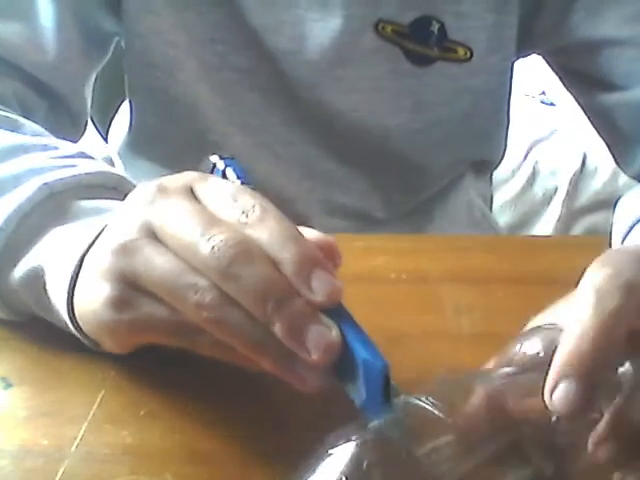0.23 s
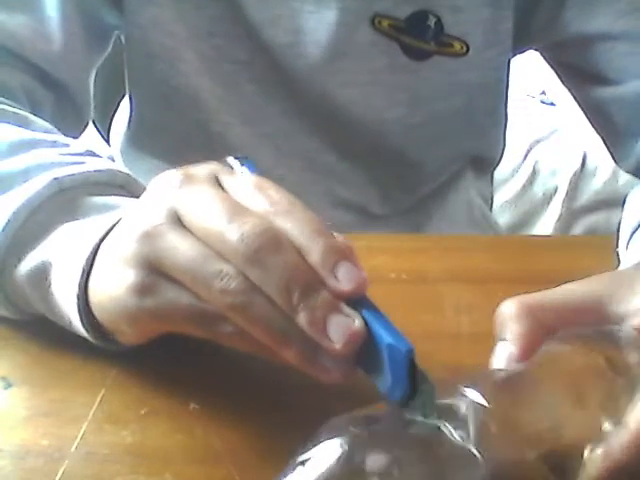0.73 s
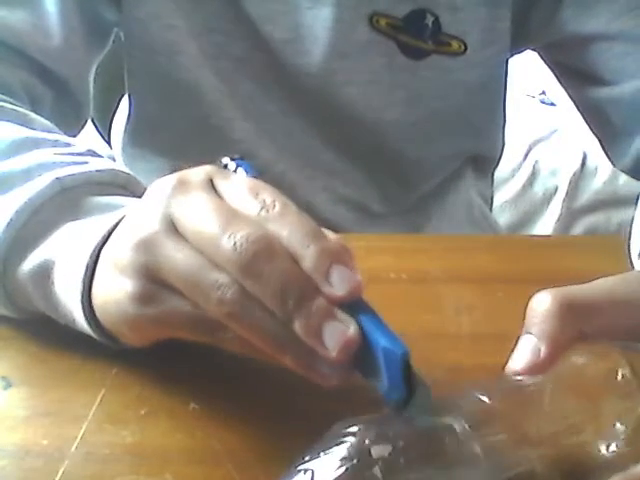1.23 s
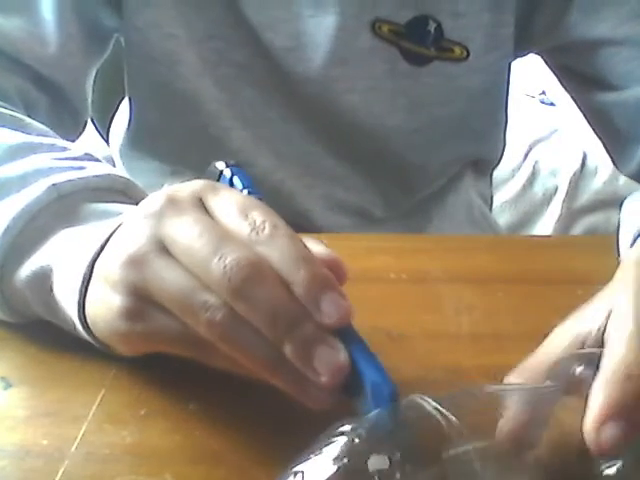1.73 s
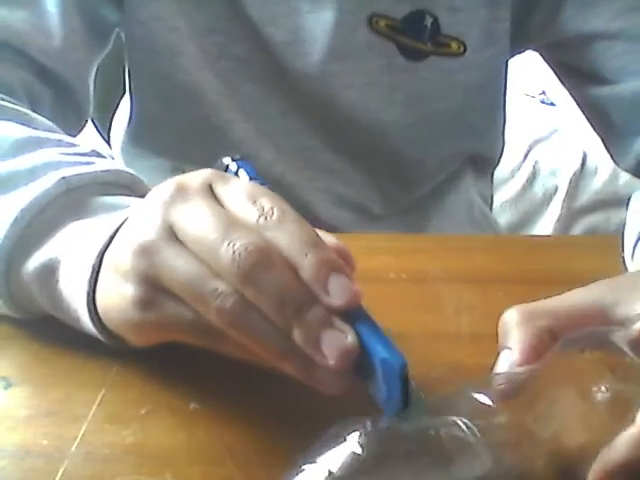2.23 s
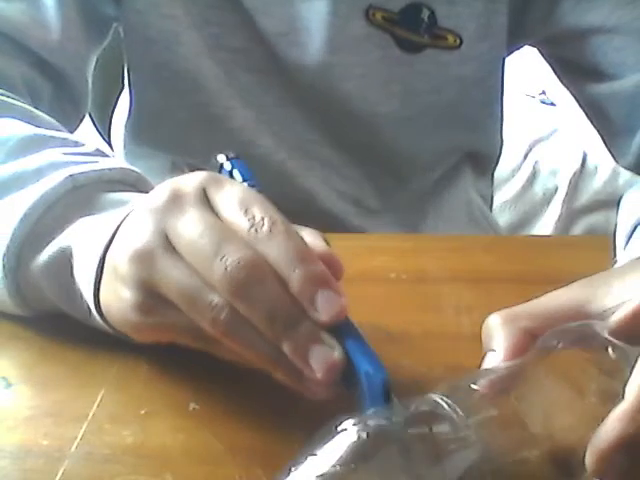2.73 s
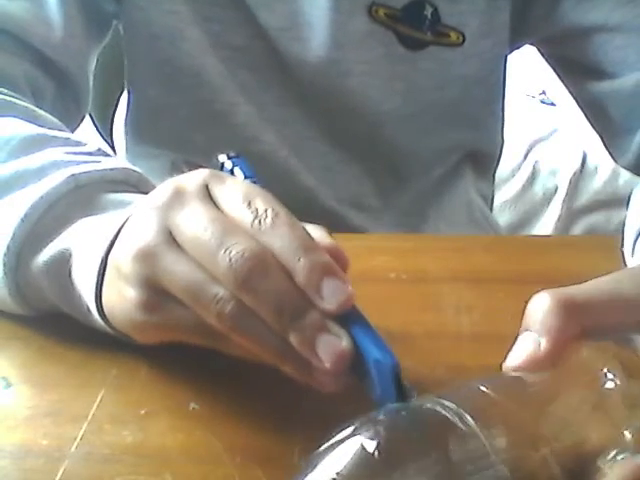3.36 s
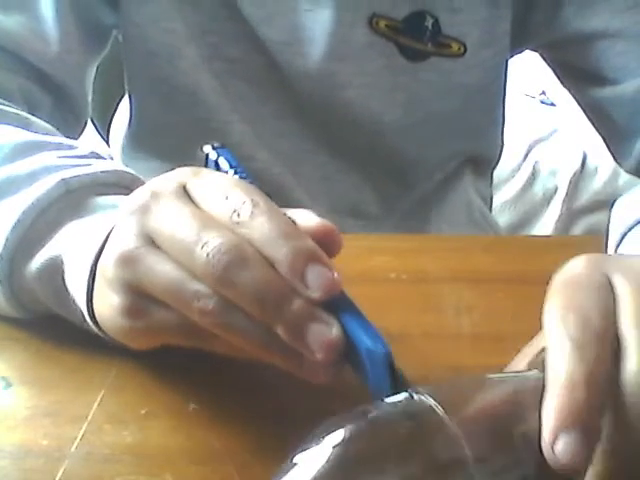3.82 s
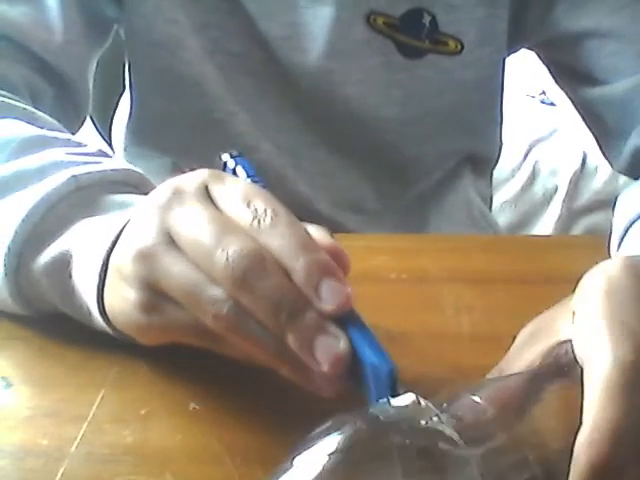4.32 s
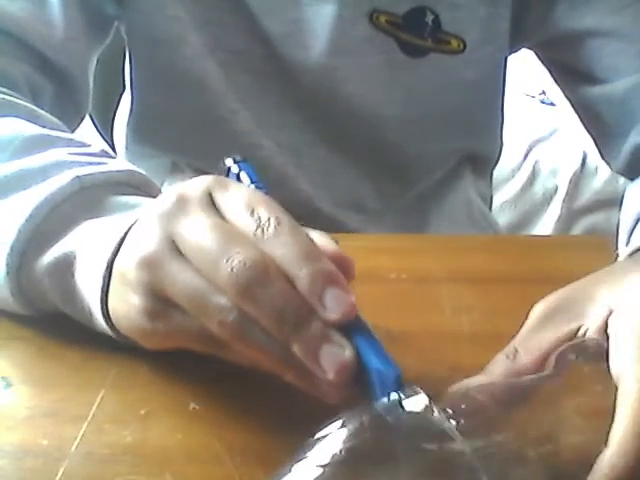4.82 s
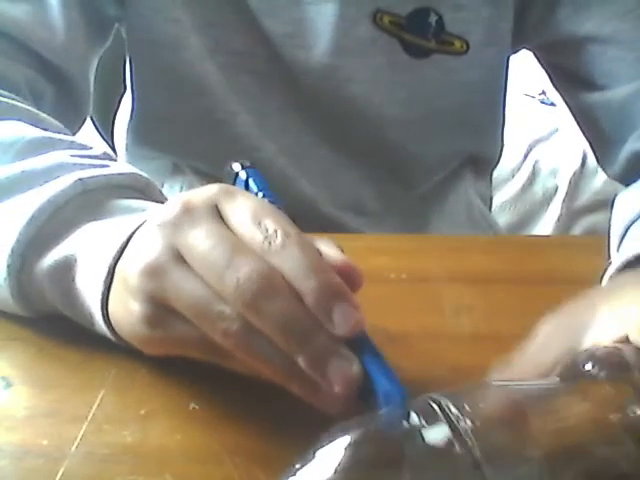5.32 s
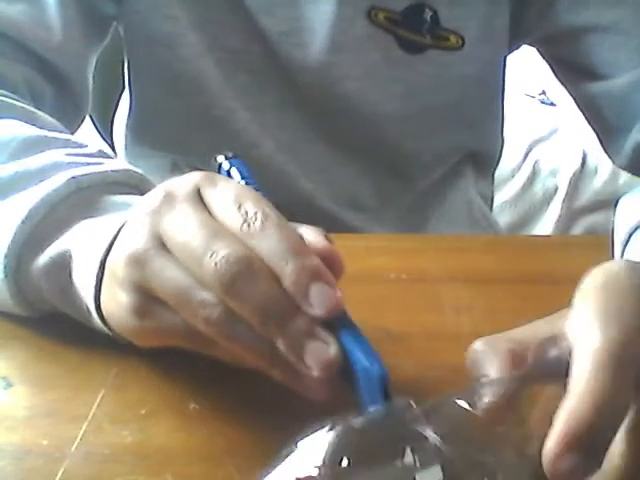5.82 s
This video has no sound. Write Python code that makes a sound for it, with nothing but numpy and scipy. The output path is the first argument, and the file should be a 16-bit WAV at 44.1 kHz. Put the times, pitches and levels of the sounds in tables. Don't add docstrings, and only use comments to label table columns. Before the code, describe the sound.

A small blade is forced through a stiff, thin plastic bottle on a wooden table, heard very close in a small room. A sharp pop at 0.2 s is followed by scratchy tearing around 0.4 and a hard, overloaded snap at 0.7. After a brief quiet, clicks and pops return at 1.2-1.3, then strong blade slips and clustered cracks from 1.9 to 2.15. From 2.2 to 3.2 it is mostly faint ticks, light rubbing and crumples, with a fuller crackle at 2.9. Dense snapping runs 3.3-4.05, with another crack at 4.3. Hard pops at 4.7 and 4.9 lead into hollow buckling and crackles to 5.25, then smaller clicks and squeaky rubs, ending with snaps at 5.8-5.9. Soft low thumps, faint hiss, a thin high whine and a short room tail persist around it.

```python
import sys
import numpy as np
from scipy import signal
from scipy.fft import rfft, irfft, next_fast_len
from scipy.io import wavfile
from scipy.ndimage import uniform_filter1d

SR = 44100
rng = np.random.default_rng(int(sys.argv[2]) if len(sys.argv) > 2 else 0)


def master_out(mix):
    frames = np.transpose(np.atleast_2d(mix))
    ceiling = np.clip(frames, -1, 1)
    pcm = np.round(ceiling * 32767).astype(np.int16)
    wavfile.write(sys.argv[1], SR, pcm)


def field_ratio(decibels):
    return 10 ** (np.asarray(decibels, dtype=float) / 20)


N = 268116

# (time [s], crack [dB], buckle [dB], panel [Hz], panel [dB])
POPS = [(0.225, 3.5, -20, 1370, -7.5), (0.6883, 9, -37.5, 1380, -6), (1.2065, -9.5, -24, 2390, -15),
        (1.3002, 4, -13, 1240, -3), (1.993, -2, -23, 1554, -2.5), (2.0398, -14, -34, 1480, -10.5),
        (2.1068, -3, -44, 1820, -7), (2.1494, 7, -16.5, 1220, -6.5), (3.266, -9, -23.5, 1310, -15),
        (3.509, -3, -14.5, 1120, -8), (3.7184, -2.5, -35, 1760, -5.5), (3.8575, -4, -23, 1440, -9),
        (3.931, -5, -15, 1240, -8.5), (3.9762, 0, -20.5, 1450, -7.5), (4.041, -2.5, -19.5, 1130, -8),
        (4.3065, -1, -40, 1892, -2.5), (4.6701, -11.5, -16, 1130, -9.5), (4.8839, -8, -11.5, 1173, -8),
        (4.9354, -20, -4, 1280, -14), (5.0561, -13.5, -5.5, 1240, -5.5), (5.0986, -10.5, -29, 980, -15.5),
        (5.117, -7, -21, 1710, -9.5), (5.2399, -0.5, -20.5, 1380, -14), (5.8091, -1.5, -11.5, 1276, -6.5)]
POP_T60_MS, SHORTER_MS_PER_DB = 30.7, 2.13
# (time [s], crack [dB], buckle [dB], panel [Hz], panel [dB])
CRUMPLES = [(0.1093, -32.5, -57, 1230, -30), (0.322, -16.5, -55, 1400, -22.5),
            (1.5688, -17.5, -30.5, 1080, -13.5), (1.6564, -27.5, -22, 912, -27.5),
            (2.6942, -27, -26, 2150, -34), (2.8948, -10.5, -10, 1840, -3.5),
            (3.0307, -31.5, -14, 1370, -30), (3.159, -61, -68, 961, -36.5), (3.2218, -27, -36, 1350, -33),
            (3.4103, -27, -38.5, 1280, -16.5), (3.6927, -11.5, -43, 1110, -24.5),
            (3.7228, -3, -12, 1220, -34.5), (3.8681, -10.5, -37, 1250, -29),
            (4.0447, -5.5, -32, 1170, -19.5), (4.3222, -9, -21, 1160, -16),
            (4.5499, -16.5, -30.5, 1070, -23), (4.5993, -13, -22.5, 1050, -20),
            (5.0777, -20.5, -37, 1360, -18.5), (5.4454, -20, -29.5, 1230, -22),
            (5.5076, -21.5, -24, 2100, -24.5), (5.9027, -9, -38.5, 1830, -4.5)]
CRUMPLE_T60_MS = 65.7
# (time [s], crack [dB], buckle [dB], panel [dB])
CLICKS = [(.0094, -33, -36, -24.5), (.5314, -27.5, -44, -24), (1.1545, -14, -39, -34),
          (1.1787, -8, -19.5, -12.5), (1.422, -27, -53, -31), (1.433, -18, -39, -19.5),
          (1.489, -29, -40, -27.5), (2.069, -29.5, -45, -20), (2.2798, -19.5, -32.5, -23),
          (2.4949, -33, -34, -29), (2.6195, -21.5, -24.5, -34), (2.738, -21, -28.5, -57),
          (3.02, -32, -16, -16), (3.4355, -19, -26, -26), (3.485, -26, -30, -29), (3.5509, -13, -24, -21),
          (3.703, -8, -30, -13), (3.778, -14, -39, -38), (3.787, -0.5, -15.5, -36), (3.8362, -39, -27, -28),
          (3.8478, -14, -24.5, -15), (3.926, -9, -23, -14), (4.5752, -22, -32, -28),
          (5.1493, -8.5, -18, -17.5), (5.2736, -26, -19, -23), (5.317, -24, -33, -37.5),
          (5.488, -17, -24, -22.5), (5.5333, -16, -17, -33), (5.681, -13, -15.5, -13.5),
          (5.906, 1, -17, -35)]
CLICK_T60_MS, PANEL_HZ = 43, 1280
# (time [s], crack [dB], buckle [dB])
TICKS = [(1.062, -40.5, -79), (1.789, -36.5, -49), (2.5257, -35.5, -37.5), (2.5899, -35.5, -39),
         (2.6482, -31, -27.5), (3.6588, -28, -46), (4.2642, -51.5, -40.5), (4.7433, -30.5, -39),
         (4.8354, -35, -34), (5.0115, -48, -42), (5.2186, -28.5, -30), (5.3507, -27.5, -56)]
TICK_T60_MS, TICK_PANEL_DB = 44, -2
# (time [s], peak [dB], colour [Hz])
EDGES = [(0.2251, 4.5, 3400), (0.6894, 2.5, 1372), (1.1795, 1, 3900), (1.3016, 0.0, 1620),
         (1.4243, -9, 5770), (1.4333, -10.5, 1390), (1.88, -13.5, 1400), (1.9228, 4.5, 5740),
         (1.9304, 2.5, 1440), (1.9921, 4.5, 1400), (2.1074, -7.5, 3080), (2.1495, 1, 2900),
         (2.2791, -12, 3940), (2.6197, -17, 4700), (3.0199, -2, 5700), (3.2681, -7, 5230),
         (3.4872, -5, 1120), (3.5096, 5.5, 1910), (3.694, -16, 3940), (3.7041, -11, 3980),
         (3.7858, -2.5, 1270), (3.8479, -7, 1340), (3.8583, -8.0, 1420), (3.9318, -10, 5930),
         (3.9772, -1.5, 5530), (4.0404, 0.5, 6000), (4.3069, 7.5, 1874), (4.3235, -15, 2300),
         (4.5513, -12.5, 4000), (4.599, -10, 3880), (4.6719, 1.5, 1150), (4.8839, 0.5, 1130),
         (5.0998, -6, 4770), (5.1191, -14, 1700), (5.1501, -16, 3940), (5.2415, 4, 5580),
         (5.6811, -9.5, 4000), (5.8087, 1, 1790), (5.9037, 1, 1690), (5.9085, 4.5, 3980)]
EDGE_T60_S, EDGE_DB = 0.0054, -4.5
# (time [s], peak [dB], colour [Hz])
FLECKS = [(0.2005, -19, 1870), (0.3092, -16, 1310), (0.3768, -3, 3940), (0.3889, 0.5, 5470),
          (0.4071, 0.5, 6170), (0.6784, -19.5, 3790), (1.1417, -41.5, 4960), (1.1887, -12.5, 4600),
          (1.2266, -32, 1140), (1.2977, -12, 1110), (1.3853, -33, 5510), (1.4537, -21, 1910),
          (1.5137, -32.0, 2650), (1.56, -30.5, 1400), (1.5925, -17, 1220), (2.2467, -29, 4000),
          (2.3045, -34.5, 4010), (2.469, -50.0, 6460), (2.5533, -36.5, 1114), (2.6533, -26, 4600),
          (2.7165, -21, 4050), (2.7481, -25, 4030), (3.4019, -22.5, 2280), (3.4179, -28, 1170),
          (3.5195, -20, 1360), (3.5895, -23, 4050), (3.6438, -26, 6010), (3.659, -24, 4030),
          (3.6826, -31, 1150), (3.7152, -11, 3900), (3.7264, -1.0, 1160), (3.7433, -22, 5360),
          (3.7922, -20, 3970), (3.8373, -24, 1580), (3.8684, -10, 3730), (4.2908, -26.5, 1494),
          (4.3507, -15, 2150), (4.486, -47, 4010), (4.5449, -24.5, 3870), (4.6903, -22, 1120),
          (4.7647, -28.5, 1160), (5.0277, -35.0, 1290), (5.0611, -10, 1250), (5.0806, -18, 2390),
          (5.2796, -10, 1400), (5.3739, -28, 5340), (5.5093, -16, 1970), (5.5448, -23, 5540),
          (5.5568, -35, 1790)]
FLECK_T60_S, FLECK_DB = 0.012, -5
# (time [s], level [dB])
JOLTS = [
    (.6893, 8),
    (1.3014, 5),
    (1.9305, 5),
    (1.9338, 5),
    (1.9918, 5),
    (2.1499, 4),
    (4.6721, 6),
    (4.8842, 6),
]
JOLT_HZ, JOLT_T60_S = 2600, 0.002
# (start [s], end [s], start level [dB], end level [dB], low share [dB])
TEARS = [(0.17, 0.221, -52, -29.5, -2), (0.298, 0.328, -23.5, -36.5, 3), (0.337, 0.369, -36, -15.5, 2),
         (0.375, 0.408, -10.5, -9, -2.5), (0.667, 0.684, -30, -23.5, -11.5),
         (0.689, 0.759, -27, -39, -16.5), (1.13, 1.152, -48, -44, 0), (1.242, 1.29, -35.5, -35, -0.5),
         (1.288, 1.298, -28, -21, -0.5), (1.556, 1.567, -33, -41, 0), (4.27, 4.302, -50, -37.5, -2),
         (4.538, 4.549, -42, -28.5, 1.5), (1.159, 1.239, -29, -28.5, 4), (1.306, 1.393, -26, -47, -1),
         (1.874, 1.897, -19, -20, -0.5), (1.922, 1.946, -4, -14.5, -9.5), (2.876, 2.889, -39, -25.5, 1),
         (2.708, 2.76, -28.5, -65.5, -1), (3.009, 3.032, -20.5, -16.5, -0.5), (3.387, 3.444, -40.5, -35, 7),
         (3.485, 3.561, -16.5, -39.5, 1.5), (3.714, 3.739, -8.5, -19, -2), (3.784, 3.79, -1.5, -45, 2),
         (4.338, 4.396, -28, -37, 0.5), (4.588, 4.637, -33.5, -49.5, 7.5), (5.136, 5.149, -12, -45.5, 3),
         (5.258, 5.281, -29, -14.5, -2), (5.526, 5.578, -20, -46, 1), (5.789, 5.796, -34, -29, -6),
         (5.928, 5.94, -24.5, -38, -8)]
# (start [s], end [s], mode [Hz], level [dB])
SINGS = [(.010, 0.055, 1500, -45.5), (0.192, .218, 1520, -35), (1.46, 1.482, 3990, -47),
         (1.873, 1.896, 4030, -40), (1.922, 1.947, 1240, -18.5), (2.156, 2.211, 1240, -35.5),
         (2.278, 2.284, 3940, -37), (3.558, 3.559, 1256, -27.5), (2.43, 2.487, 518, -62),
         (2.506, 2.576, 530, -43.5), (2.418, 2.44, 5600, -72), (2.704, 2.738, 2150, -42),
         (2.683, 2.744, 2810, -45.5), (2.847, 2.861, 1480, -56), (0.667, .68, 1930, -39),
         (.7, 0.859, 1275, -58), (.93, .97, 1720, -72.5), (1.058, 1.067, 1225, -58),
         (1.587, 1.644, 4130, -60), (3.36, 3.388, 3600, -67), (3.55, 3.585, 1130, -34),
         (3.584, 3.594, 3950, -45), (3.655, 3.657, 4050, -40), (3.685, 3.717, 4030, -44),
         (4.485, 4.488, 4100, -59), (5.027, 5.036, 2150, -63), (5.072, 5.15, 613, -32.5),
         (5.38, 5.524, 233, -41.5), (5.53, 5.586, 591, -29.5), (2.584, 2.794, 443, -45),
         (4.364, 4.392, 520, -31.5), (4.572, 4.573, 4100, -42), (4.593, 4.63, 3840, -34),
         (4.769, 4.837, 2150, -45), (4.837, 4.935, 2150, -41), (4.972, 4.994, 620, -42),
         (5.009, 5.056, 614, -34.5), (5.03, 5.05, 1290, -57), (5.146, 5.149, 4050, -30),
         (5.236, 5.259, 1240, -25), (5.264, 5.276, 3960, -34), (5.696, 5.733, 640, -44.5),
         (5.807, 5.863, 1240, -31), (5.913, 5.964, 1280, -38.5), (5.928, 5.953, 654, -29.5),
         (5.974, 5.987, 634, -38.5)]
# (start [s], hold [s], rasp [dB], hollow [dB])
STROKES = [(0, 0.0048, -50, -33), (0.249, 0.23, -51, -37), (0.716, 0.017, -39.5, -50),
           (1.244, 0.06, -42, -39), (1.465, 0.017, -47.5, -35), (1.613, 0.052, -48, -36.5),
           (2.021, 0.013, -39.5, -30.5), (2.129, 0.057, -35.5, -43.5), (2.245, 0.018, -58.5, -39),
           (2.516, 0.056, -60.5, -50.5), (2.678, 0.063, -41.5, -36), (2.97, .08, -52.5, -40),
           (3.202, 0.1, -61.5, -46), (3.484, 0.13, -45, -35.5), (3.76, 0.015, -37, -22),
           (3.852, 0.068, -44.5, -38.5), (4.019, 0.071, -59, -44.5), (4.32, 0.072, -48, -46),
           (4.624, 0.18, -49, -40), (4.799, 0.099, -43, -32.5), (5.006, 0.45, -69, -50.5),
           (5.307, 0.017, -43.5, -31), (5.448, 0.23, -51, -44), (5.562, 0.035, -48.5, -35.5),
           (5.684, 0.054, -53, -56), (5.841, 0.061, -44.5, -39), (5.933, 0.029, -54.5, -49)]
PRESS_DB_PER_S, LIFT_DB_PER_S, REST_DB = 191, 187.5, -87.5
# (time [s], pitch [Hz])
WALL = [(.4, 394.4), (.69, 718), (1.25, 593), (1.65, 383.5), (1.88, 325), (2.15, 641), (2.28, 433),
        (3.27, 446.4), (3.765, 379.4), (3.79, 757), (3.93, 701), (3.98, 455.4), (4.3, 488), (4.6, 523),
        (4.88, 620.6), (5.15, 558), (5.5, 551), (5.68, 646)]
# (centre [Hz], width [Hz], level [dB])
SHELL = [(1240, 23, 1.5), (2150, 56, -8.5), (2670, 140, 1), (3425, 79, -0.5), (3940, 140, 5),
         (4500, 190, -11.5), (5480, 330, -12.5), (6060, 44, -25), (7380, 430, 3.5)]
# (time [s], level [dB])
SWAY = [(0.0, -48.5), (0.29, -48.5), (0.61, -57), (0.85, -72), (1.1, -72.5), (1.35, -56.5), (2.0, -58),
        (2.32, -69), (2.66, -55), (2.98, -53), (4.52, -56.5), (5.27, -52.5), (5.69, -43.5), (6.08, -51.5)]
# (time [s], peak [dB])
THUMPS = [(0.061, -31.5), (0.225, -22), (0.415, -12), (0.68, -30), (1.18, -17.5), (1.459, -26),
          (1.576, -23.5), (1.788, -35), (1.888, -23.5), (2.276, -30.5), (2.504, -40), (2.893, -13),
          (3.025, -19.5), (3.267, -24), (3.433, -30), (3.493, -20.5), (3.714, -19), (3.928, -24),
          (4.046, -19.5), (4.302, -28), (4.54, -31), (4.57, -22.5), (4.928, -32.5), (5.051, -26),
          (5.14, -24), (5.528, -21), (5.9, -25.5)]
ROOM_T60_S, ROOM_DB = 0.13, -17.5
# (frequency [Hz], density [dB per Hz])
HISS = [(30, -14.5), (140, -3.5), (400, -25.5), (1500, -18.5), (3000, -20.5), (5000, -23.5), (7000, -34.5)]
HISS_DB = -65
WHINE_HZ, WHINE_DB = 6487, -74
SAMPLING_HZ = 16000


def rms_one(x):
    return x / np.sqrt(np.mean(x ** 2) + 1e-20)


def in_time(rows):
    s, *columns = np.transpose(rows)
    return [np.interp(np.arange(N) / SR, s, c) for c in columns]


def band(x, low_hz, high_hz):
    return signal.sosfilt(signal.butter(2, [low_hz, high_hz], "band", fs=SR, output="sos"), x + 1e-18)


def poles(hz, width_hz):
    r = np.exp(-np.pi * width_hz / SR)
    return (1 - r * r) / 2 * np.array([1, 0, -1]), [1, -2 * r * np.cos(2 * np.pi * hz / SR), r * r]


def resonate(x, hz, width_hz):
    return signal.lfilter(*poles(hz, width_hz), x)


def drift(rate_hz):
    r = np.exp(-64 * np.pi * rate_hz / SR)
    chance = rng.standard_normal(N // 32 + 1002)
    slow = signal.lfilter([1], [1, -2 * r, r * r], chance)[1000:]
    return np.interp(np.arange(N) / 32, np.arange(len(slow)), rms_one(slow))


def add(track, s, sound):
    i = round(s * SR)
    track[i:i + len(sound)] += sound[:N - i]


def struck(hz, t60_s, rise_s):
    t = np.arange(round(1.3 * t60_s * SR)) / SR
    return np.sin(2 * np.pi * hz * t) * field_ratio(-60 * t / t60_s) * (1 - np.exp(-t / rise_s))


def grit(per_s, spread_db, smooth):
    sizes = field_ratio(spread_db * np.minimum(rng.exponential(1, N), 4)) * rng.choice([-1, 1], N)
    slips = rms_one(sizes * (rng.random(N) < per_s / SR))
    return (slips + smooth * rng.standard_normal(N)) / np.sqrt(1 + smooth ** 2)


def all_snaps():
    pops = [(*row, POP_T60_MS - SHORTER_MS_PER_DB * max(row[1], 0)) for row in POPS]
    crumples = [(*row, CRUMPLE_T60_MS) for row in CRUMPLES]
    clicks = [(s, crack_db, buckle_db, PANEL_HZ, panel_db, CLICK_T60_MS)
              for s, crack_db, buckle_db, panel_db in CLICKS]
    ticks = [(s, crack_db, buckle_db, PANEL_HZ, crack_db + TICK_PANEL_DB, TICK_T60_MS)
             for s, crack_db, buckle_db in TICKS]
    return sorted(pops + crumples + clicks + ticks)


def snaps():
    crack, body, rings = np.zeros(N), np.zeros(N), np.zeros(N)
    rows = all_snaps()
    noise = rng.standard_normal((len(rows), 2, 4000))
    dents = rng.random((len(rows), 6))
    wall_hz = in_time(WALL)[0]
    t = np.arange(4000) / SR
    for row, (bright, dull), dent in zip(rows, noise, dents):
        s, crack_db, buckle_db, panel_hz, panel_db, t60_ms = row
        t60_s = np.clip(t60_ms, 4, 120) / 1e3
        dying = field_ratio(-60 * t / t60_s) * (1 - np.exp(-t / 0.00064))
        sudden = 1 + 2.23 * field_ratio(-60 * t / 0.0074)
        tinted = bright + 0.73 * resonate(bright, 2400 + 4200 * dent[0], 400)
        add(crack, s, field_ratio(crack_db - 10.5) * dying * sudden * tinted)
        add(body, s, field_ratio(panel_db + 3.5) * dying * dull)
        for hz in 2500 + 700 * (np.arange(6) + dent):
            add(rings, s, field_ratio(crack_db - 30) * struck(hz, 0.24 * t60_s, rise_s=0.0016))
        pop_db = panel_db + 2.0 - 150 * t60_s
        add(rings, s, field_ratio(pop_db) * struck(0.971 * panel_hz, 0.007, rise_s=0.00033))
        add(rings, s, field_ratio(panel_db - 6.0) * struck(panel_hz, 0.028, rise_s=0.00024))
        add(rings, s, field_ratio(buckle_db + 7.5) * struck(wall_hz[round(s * SR)], 0.032, rise_s=0.0011))
    return band(crack, 1400, 16000) + band(body, 390, 1800), rings


def edges():
    out = np.zeros(N)
    for rows, t60_s, gain_db in [(EDGES, EDGE_T60_S, EDGE_DB), (FLECKS, FLECK_T60_S, FLECK_DB)]:
        for s, db, hz in rows:
            add(out, s, field_ratio(db + gain_db) * struck(hz, t60_s, rise_s=0.0001))
            add(out, s, field_ratio(db + gain_db - 9.5) * struck(0.62 * hz, t60_s, rise_s=0.0006))
            add(out, s, field_ratio(db + gain_db - 5.5) * struck(1.47 * hz, 0.6 * t60_s, rise_s=0.0001))
    return out


def jolts():
    out = np.zeros(N)
    for s, db in JOLTS:
        add(out, s, field_ratio(db) * struck(JOLT_HZ, JOLT_T60_S, rise_s=0.00005))
    return out


def tears():
    bright, dull = np.zeros(N), np.zeros(N)
    for start, end, start_db, end_db, low_db in TEARS:
        level_db = np.linspace(start_db, end_db, round((end - start) * SR))
        add(bright, start, field_ratio(level_db))
        add(dull, start, field_ratio(level_db + low_db))
    slip_hz = 170 * field_ratio(2.7 * drift(28))
    phase = np.cumsum(slip_hz / SR) % 1
    slips = field_ratio(-9 * phase + 2.5 * drift(120)) * grit(3500, spread_db=3.5, smooth=0.6)
    letting_go = np.exp(-1 / (0.007 * SR))
    bright, dull = signal.lfilter([1 - letting_go], [1, -letting_go], [bright, dull])
    return field_ratio(4.0) * band(bright * slips, 2800, 13000) + field_ratio(11.5) * band(dull * slips, 130, 1600)


def singing():
    out = np.zeros(N)
    friction = field_ratio(drift(60)) * rng.standard_normal(N)
    for start, end, hz, db in SINGS:
        i, length = round(start * SR), round((end - start) * SR)
        fading = friction[i:i + length] * field_ratio(np.linspace(0, -10.5, length))
        push = np.r_[fading, np.zeros(SR // 20)]
        tone = resonate(push, hz, 40 + 0.02 * hz)
        add(out, start, field_ratio(db) * tone / np.std(tone[:length]))
    return out


def shell(x, lift_db, wander_db):
    out = x
    for hz, width_hz, db in SHELL:
        out = out + field_ratio(db + lift_db + wander_db * drift(10)) * resonate(x + 1e-18, hz, width_hz)
    return out


def hollow(x, width_hz):
    out, state, wall_hz = np.zeros(N), np.zeros(2), in_time(WALL)[0]
    for i in range(0, N, 256):
        out[i:i + 256], state = signal.lfilter(*poles(wall_hz[i], width_hz), x[i:i + 256], zi=state)
    return out


def strokes():
    t = np.arange(N) / SR
    power = field_ratio(2 * REST_DB) * np.ones((2, N))
    for s, hold_s, rasp_db, hollow_db in STROKES:
        press_db = PRESS_DB_PER_S * np.maximum(s - t, 0)
        lift_db = LIFT_DB_PER_S * np.maximum(t - s - hold_s, 0)
        power = power + field_ratio(2 * np.array([[rasp_db], [hollow_db]])) * field_ratio(-2 * (press_db + lift_db))
    return 10 * np.log10(power)


def rubbing():
    rasp_db, hollow_db = strokes()
    bite = np.clip((rasp_db + 66) / 20, 0.1, 1)
    uneven = field_ratio(bite * (2.2 * drift(25) + 2.6 * drift(90)))
    friction = uneven * grit(1200, spread_db=4.5, smooth=0.8 / bite)
    rasp = rms_one(shell(band(friction, 1700, 9000), lift_db=5, wander_db=4))

    loose_wall = hollow(friction, width_hz=60)
    breath = field_ratio(-6.5) * band(friction, 220, 1300)
    murmur = rms_one(loose_wall + breath + field_ratio(-8) * resonate(friction, 1300, 290))

    table_low = resonate(rng.standard_normal(N), 120, 27)
    table = rms_one(table_low + field_ratio(-13.5) * resonate(friction, 230, 22))
    sway = rms_one(resonate(rng.standard_normal(N), 58, 5.3))
    pressure_db = -18.0 + 0.62 * uniform_filter1d(hollow_db, size=2000)

    on_wall = field_ratio(rasp_db + 2.2) * rasp + field_ratio(hollow_db - 5.5) * murmur
    return on_wall + field_ratio(pressure_db) * table + field_ratio(in_time(SWAY)[0] + 4.0) * sway


def thumps():
    out = np.zeros(N)
    for (s, db), seat in zip(THUMPS, rng.standard_normal((len(THUMPS), 3))):
        add(out, s, field_ratio(db + 3) * struck(116 + 6 * seat[0], 0.13, rise_s=0.0047))
        add(out, s, field_ratio(db - 6.5 + 1.6 * seat[1]) * struck(150, 0.2, rise_s=0.011))
        add(out, s, field_ratio(db - 10.0 + 3.2 * seat[2]) * struck(228, 0.19, rise_s=0.0038))
    return out


def room(x):
    t = np.arange(SR // 2) / SR
    dense = band(rng.standard_normal(len(t)), 230, 4300)
    tail = dense * field_ratio(-60 * t / ROOM_T60_S) * (1 - np.exp(-t / 0.0011))
    return field_ratio(ROOM_DB) * signal.fftconvolve(x, tail / np.sqrt(np.sum(tail ** 2)))[:N]


def floor():
    size = next_fast_len(N)
    hz = np.fft.rfftfreq(size, 1 / SR) + 1
    hiss_hz, hiss_db = np.transpose(HISS)
    colour = field_ratio(np.interp(np.log(hz), np.log(hiss_hz), hiss_db))
    tones = rfft(rng.standard_normal(N), size) * colour
    octave = np.clip(np.log2(hz / 400).astype(int), 0, 4)
    patchy = np.zeros(N)
    for k in range(5):
        patchy += field_ratio(2.0 * drift(6)) * irfft(tones * (octave == k), size)[:N]
    top = rms_one(resonate(rng.standard_normal(N), 6550, 200))
    return field_ratio(HISS_DB - 0.9) * rms_one(patchy) + field_ratio(-76) * top


def scene():
    cracks, rings = snaps()
    through_shell = shell(cracks + tears(), lift_db=-7.0, wander_db=10.5)
    blade = through_shell + rings + singing() + edges()
    return (blade + room(blade) + rubbing() + thumps() + floor() + jolts())[None]


def band_limit(x):
    return signal.sosfilt(signal.butter(12, 16000, fs=SR, output="sos"), x)


def record(dry):
    x = signal.sosfilt(signal.butter(2, 45, "high", fs=SR, output="sos"), dry)
    x = x + field_ratio(-2.0) * resonate(x, 7020, 3200)
    x = np.clip(x, -1.6, 1.6)
    x = signal.sosfilt(signal.cheby2(10, 55, 7900, fs=SR, output="sos"), x)
    x = signal.sosfilt(signal.butter(4, 7300, fs=SR, output="sos"), x)
    t = np.arange(N) / SR
    x = x + field_ratio(WHINE_DB + 3 + 0.5 * drift(3)) * np.sin(2 * np.pi * WHINE_HZ * t)
    image = x * np.cos(2 * np.pi * SAMPLING_HZ * t)
    mirror = band(image, 8500, 10800) + field_ratio(-9) * band(image, 12800, 15300)
    hiss = field_ratio(-89.5) * rng.standard_normal(N)
    x = np.clip(x + field_ratio(-34.5) * mirror + hiss, -1, 1)
    x = signal.sosfilt(signal.cheby2(10, 60, 16500, fs=SR, output="sos"), x)
    return band_limit(x)


dry = scene()
out = record(dry)
master_out(out)
```